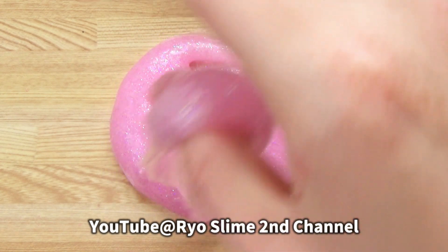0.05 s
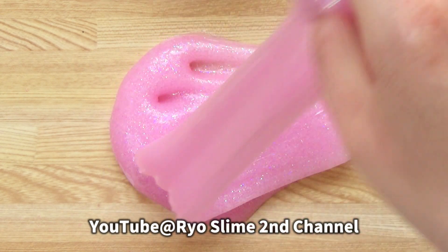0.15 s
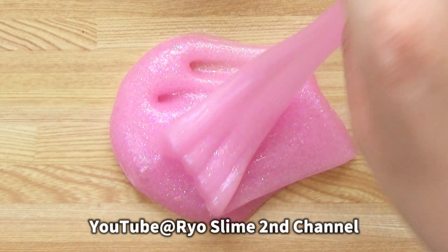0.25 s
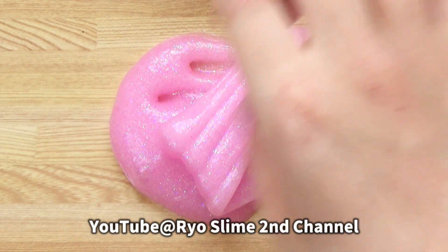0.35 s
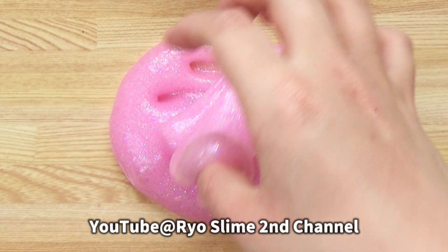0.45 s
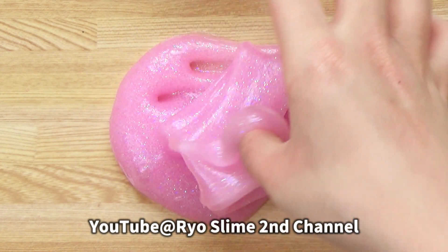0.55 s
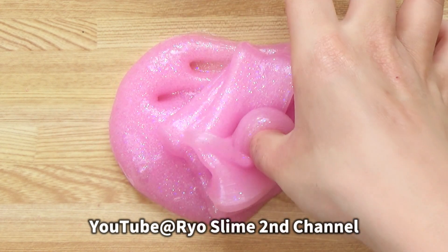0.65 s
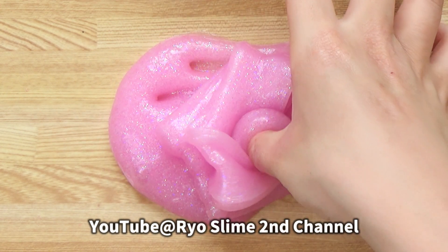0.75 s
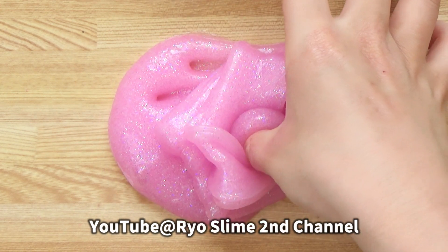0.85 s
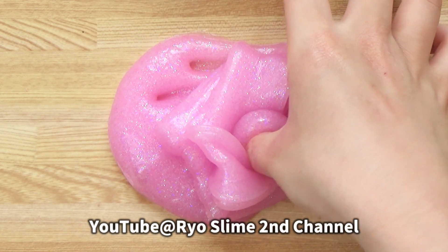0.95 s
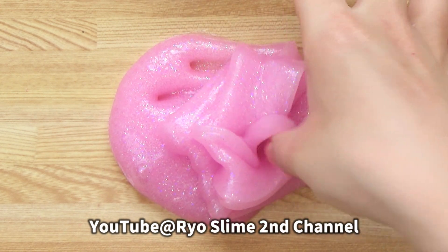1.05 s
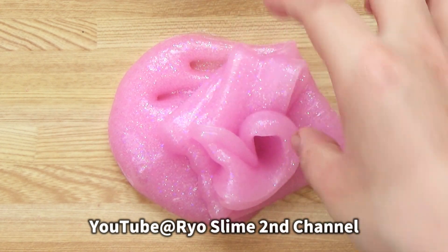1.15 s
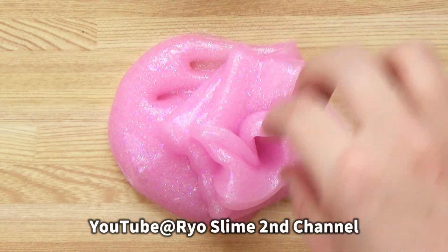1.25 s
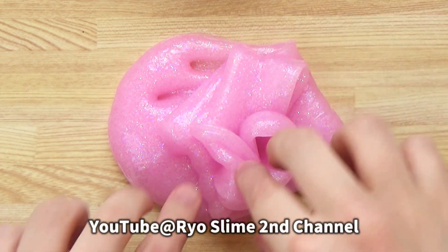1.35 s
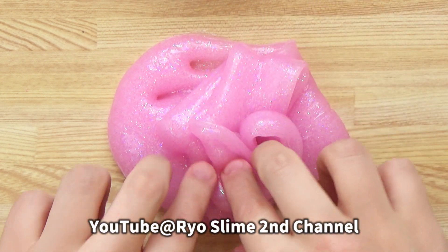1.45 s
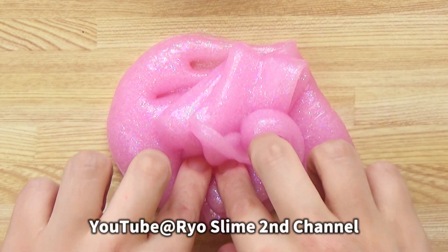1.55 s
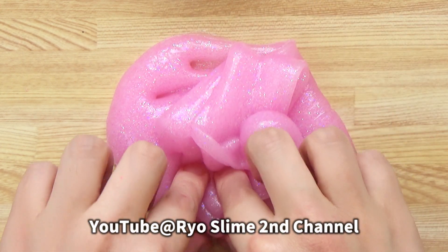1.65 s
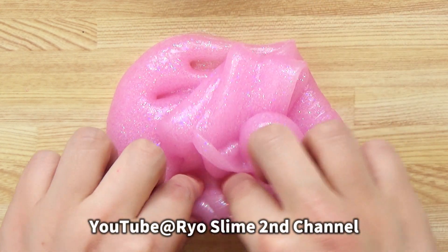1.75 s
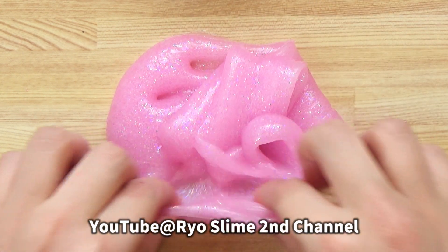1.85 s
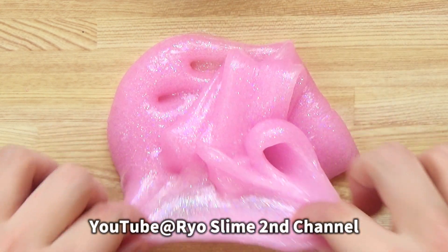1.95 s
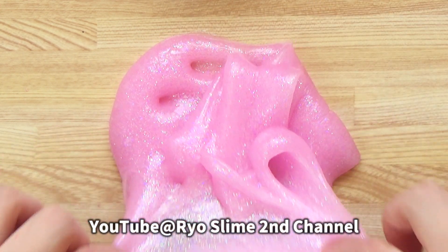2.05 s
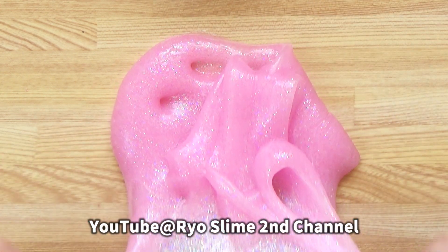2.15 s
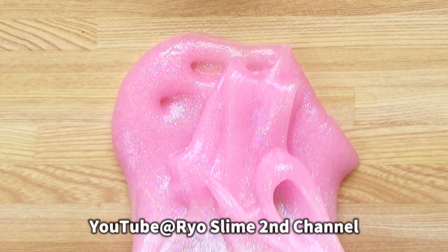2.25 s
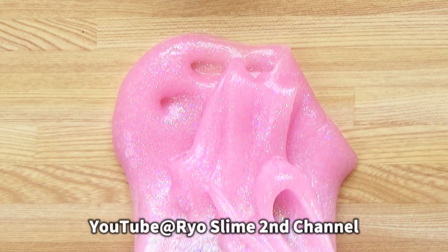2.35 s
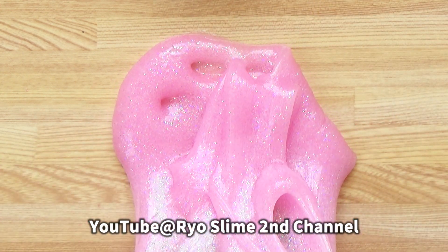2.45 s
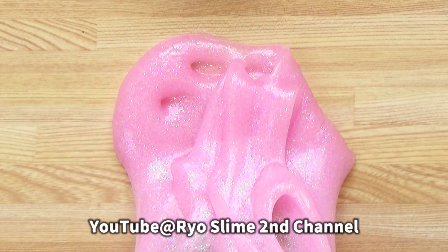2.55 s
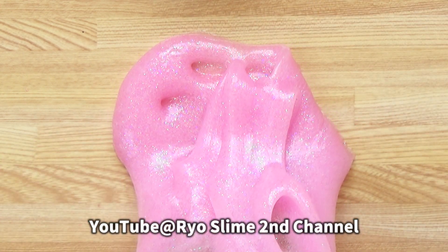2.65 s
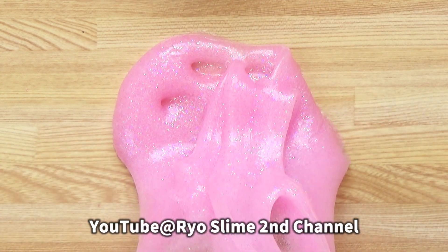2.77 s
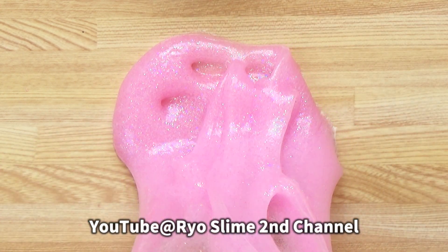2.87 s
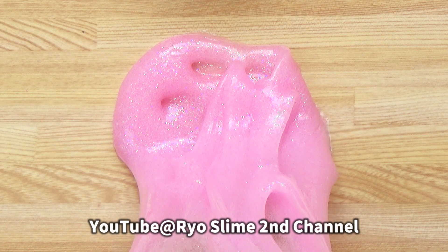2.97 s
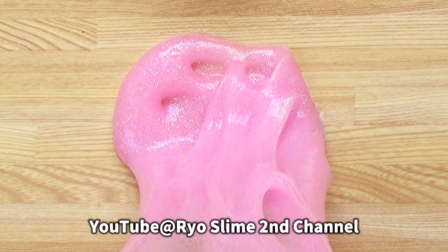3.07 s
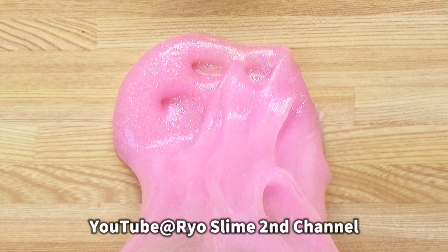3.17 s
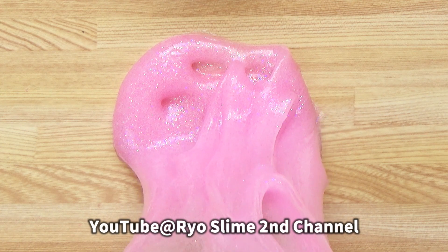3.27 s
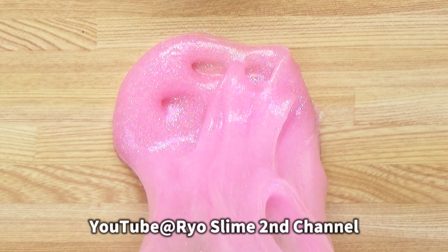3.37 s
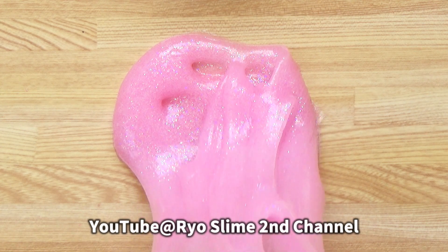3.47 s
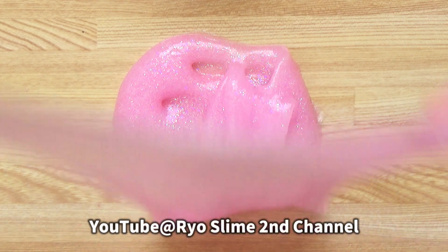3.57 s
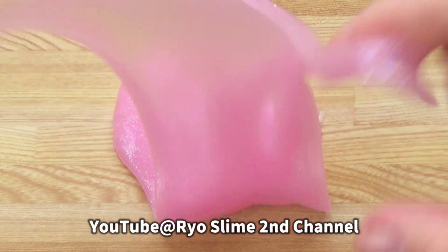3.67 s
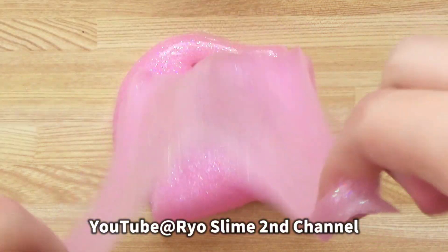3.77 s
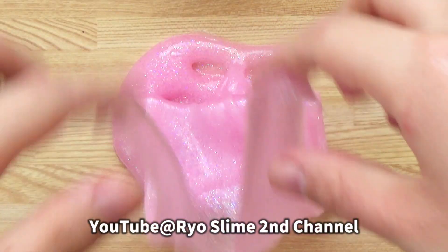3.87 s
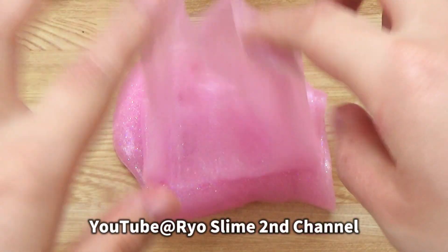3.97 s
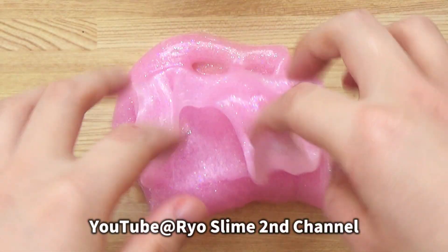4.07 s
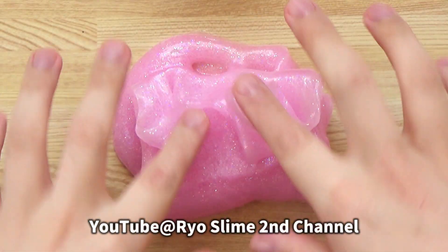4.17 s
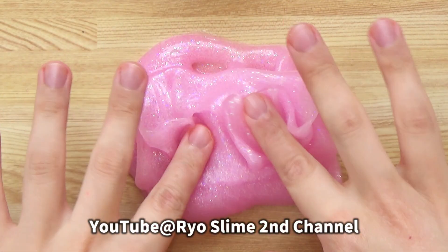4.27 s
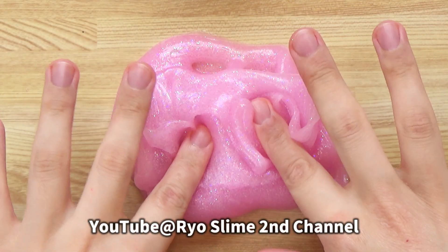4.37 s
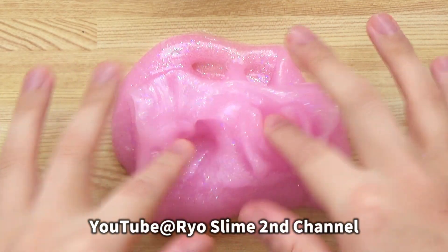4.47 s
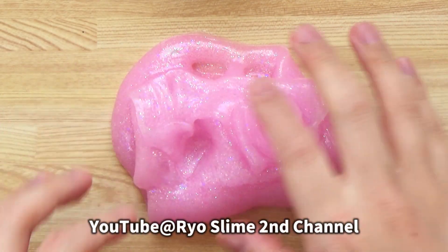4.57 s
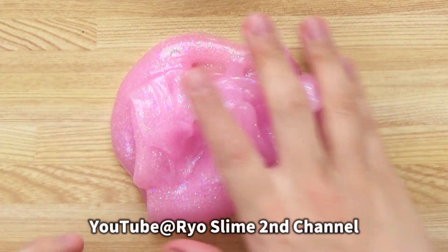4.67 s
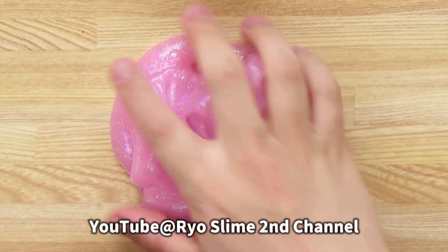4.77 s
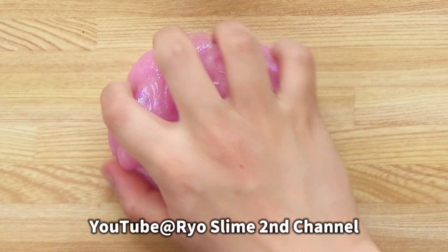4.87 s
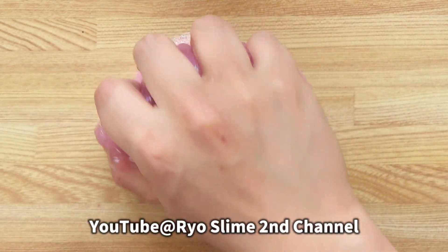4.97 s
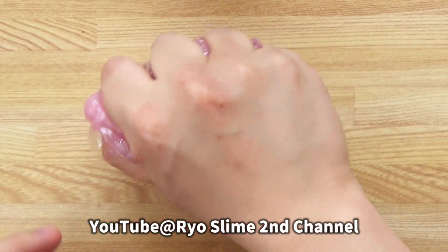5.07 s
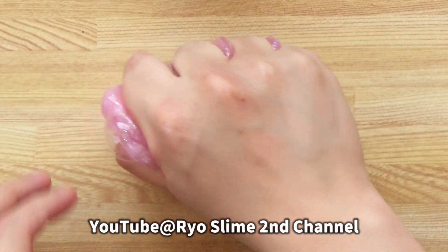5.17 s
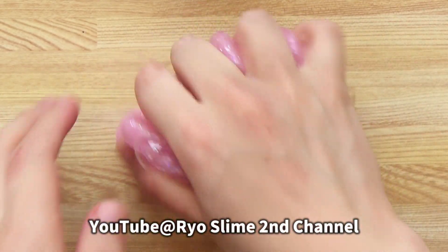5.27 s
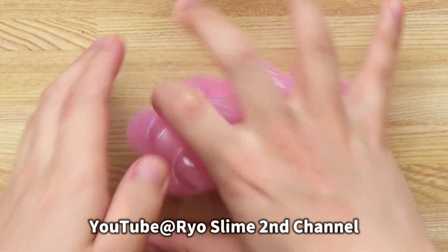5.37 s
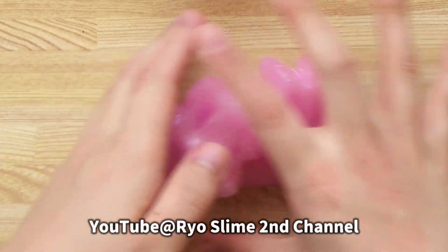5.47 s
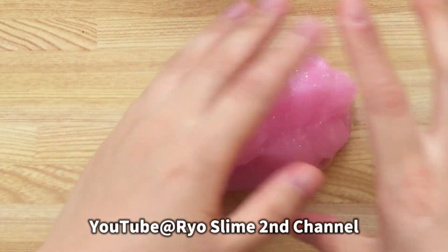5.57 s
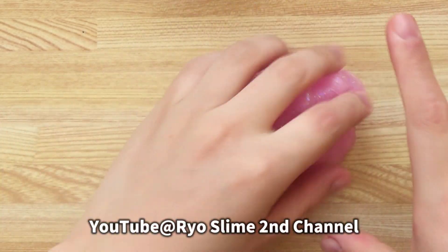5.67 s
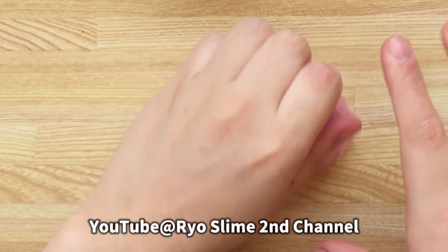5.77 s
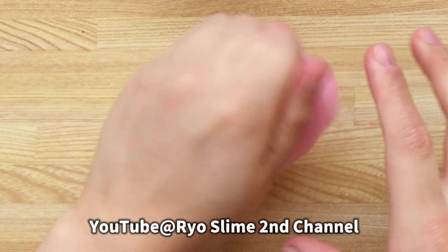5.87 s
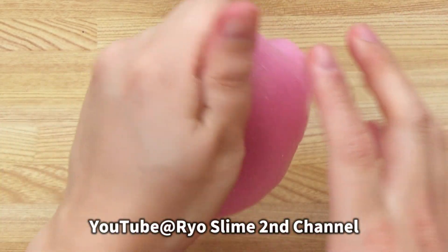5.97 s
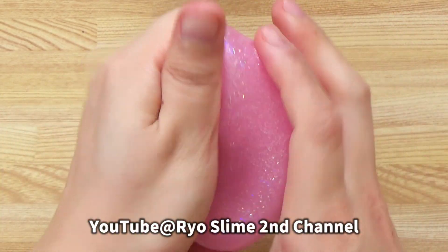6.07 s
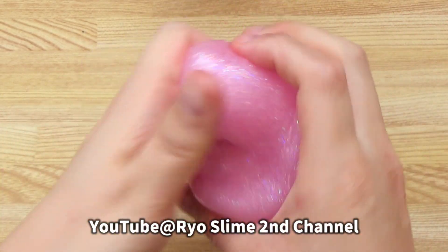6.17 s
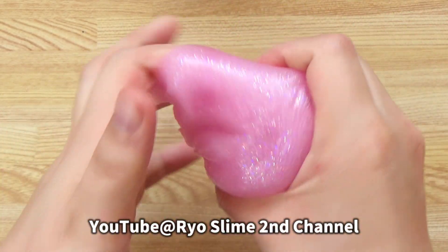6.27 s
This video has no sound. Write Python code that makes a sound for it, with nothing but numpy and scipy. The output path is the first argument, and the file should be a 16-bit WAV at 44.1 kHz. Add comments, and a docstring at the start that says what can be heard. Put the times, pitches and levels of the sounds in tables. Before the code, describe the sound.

Hands work sticky slime on a wooden table, heard close up in stereo over the soft tone of a small room. The first second holds a few soft, low thuds and faint sticky ticks. At about 1.1 seconds an air pocket pops loudly with a wet squelch. Near 1.9 seconds another squeeze brings a sharp snap and crackle. From 2.2 to 3.8 seconds it is quiet, with only a faint sizzle of tiny bubbles as the slime stretches. Around 4 seconds the table thuds several times, once heavily, and rumbles briefly; a squelch and more thuds follow at 4.5. From 4.9 to about 6.3 seconds comes a busy run of kneading: slime snaps off the fingers, pockets pop, bubbles click and fizz, and air squirts out, most sharply near 5.85 seconds. The slime sounds have a slight, short room echo.

```python
"""A hand squishes, stretches and folds sticky slime on a wooden table, close to two microphones.
First come soft thuds over the quiet tone of a small room. After a second the slime pops and squelches;
the room tone sinks, as it does twice more. Near two seconds comes another squeeze, then a faint sizzle of
tiny bubbles. Around four seconds the table thuds and rumbles. From five on, sticky skins snap off the
fingers, holes pop and air squirts in a busy run. The slime's sounds echo briefly in the room."""
import sys
import numpy as np
from scipy import signal
from scipy.fft import rfft, irfft
from scipy.io import wavfile

SR = 44100
rng = np.random.default_rng(int(sys.argv[2]) if len(sys.argv) > 2 else 0)


def inscribe(sig):
    """Save sig as 16-bit PCM at rate SR to the path in sys.argv[1].

    A 1-D sig is mono; a 2-D sig holds one channel per row.
    Samples are clipped to [-1, 1] before scaling.
    """
    pcm = np.round(np.clip(np.atleast_2d(sig).T, -1, 1) * 32767)
    wavfile.write(sys.argv[1], SR, pcm.astype(np.int16))


N = 279153
TIME = np.arange(N) / SR
SIDES = np.array([[1], [-1]])  # left, right

# Slime and palms landing on the table. Each row: start in seconds, peak in dB, push length in seconds.
TABLE_BLOWS = [(0.083, -14, 0.013), (0.336, -13, 0.0057), (0.52, -15.5, 0.0089), (0.852, -18, 0.0092),
               (1.149, -10, 0.0067), (1.932, -17.5, 0.0027), (3.812, -14, 0.0068), (3.94, -12.5, 0.0013),
               (4.011, -10.5, 0.0054), (4.071, -1.5, 0.0098), (4.116, -18, 0.0048), (4.231, -20.5, 0.0096),
               (4.537, -8, 0.0025), (4.574, -7.5, 0.0046), (4.927, -18.5, 0.0048), (5.0707, -23.5, 0.001),
               (5.211, -25, 0.0017), (5.379, -11.5, 0.0036), (5.84, -23.5, 0.0073), (6.067, -31, 0.0032),
               (6.281, -23.5, 0.0074)]


def undb(db):
    """Turn decibels (dB) into a factor to multiply by."""
    return 10 ** (np.asarray(db) / 20)


def band(x, lo_hz, hi_hz, order=2):
    """Keep mainly what lies between two frequencies."""
    return signal.sosfilt(signal.butter(order, [lo_hz, min(hi_hz, .45 * SR)], "band", fs=SR, output="sos"), x)


def unit(x):
    """Scale a signal to an average power of 1."""
    return x / np.sqrt(np.mean(x ** 2))


def add(out, sound, start, pan_db=0.):
    """Mix a short sound in at start seconds, pan_db louder on the left than on the right."""
    i = int(start * SR)
    n = min(sound.shape[-1], N - i)
    out[:, i:i + n] += (sound * undb(SIDES * pan_db / 2))[:, :n]


def stereo_noise(count, alike):
    """Noise at the two microphones: unrelated when alike is 0, the same when it is 1."""
    mid, side = rng.standard_normal((2, count))
    return np.sqrt(1 + alike) * mid + np.sqrt(1 - alike) * side * SIDES


def bubbles(count, per_s, spread_db, alike):
    """Bubbles burst at random moments, most faintly and a few strongly."""
    bursts = rng.random(count) < per_s / SR
    strength = undb(spread_db * np.minimum(rng.exponential(size=count), 4))
    puffs = signal.lfilter([1], [1, -.95], bursts * strength)  # each lets out air for half a millisecond
    return puffs * stereo_noise(count, alike)


def swell(t, fade_s, rise_share):
    """A rise to full strength at t = 0, taking a share of the fade time, then a rounded fade."""
    return np.where(t < 0, np.exp(-(t / (rise_share * fade_s)) ** 2), np.exp(-abs(t / fade_s) ** 1.44))


def dips(sink_s=0.14, return_s=0.31):
    """The background level sinks fast at three moments and creeps back."""
    # Each row: start in seconds, strength in dB (the dip reaches about 0.4 of it).
    level_dips = [(1.1, 33.5), (1.951, 12.5), (5.3, 36)]
    elapsed = [(np.maximum(TIME - start, 0), db) for start, db in level_dips]
    return undb(-sum(db * (1 - np.exp(-t / sink_s)) * np.exp(-t / return_s) for t, db in elapsed))


def room_tone(level_db=-49, split_hz=500, extra_dip=.8):
    """The room's own soft noise, duller towards the top; the part above split_hz dips deeper."""
    # The colour of the noise. Each row: frequency in Hz, relative level in dB.
    tone_colour = [(70, -44), (110, -7.5), (500, -16), (1100, -18), (1800, -29.5), (3500, -37), (6000, -73)]
    hz, db = np.transpose(tone_colour)
    freqs = np.arange(N // 2 + 1) * SR / N
    colour = undb(np.interp(np.log(freqs + 1), np.log(hz), db))
    noise = unit(irfft(rfft(stereo_noise(N, 0.44)) * colour, N))
    low = signal.sosfiltfilt(signal.butter(2, split_hz, fs=SR, output="sos"), noise)
    return undb(level_db) * dips() * (low + dips() ** extra_dip * (noise - low))


def room_echo(x, level_db=-21, low_ring_s=0.4, high_ring_s=.3):
    """A fading cloud of echoes, a little different at each microphone; the treble dies first."""
    t = TIME[:SR // 2]
    noise = unit(stereo_noise(len(t), 0.83)) * (t > .004)
    low = band(noise, 100, 1900) * undb(-60 * t / low_ring_s)
    high = band(noise, 2500, 7200) * undb(-60 * t / high_ring_s)
    echo = low + .5 * high
    echo /= np.sqrt(np.sum(echo ** 2) / 2)
    return undb(level_db) * signal.fftconvolve(x.mean(axis=0)[None], echo, axes=1)[:, :N]


def table_rumble(shake_db=-16, fade_s=0.063, rest_db=-44.5):
    """The table top shakes in low, uneven lumps, most just after a blow."""
    lumps = undb(3 * unit(band(rng.standard_normal(N), 3, 15)))
    noise = stereo_noise(N, .25) * lumps
    rumble = unit(band(noise, 37, 93) + 0.38 * band(noise, 20, 185))
    shake = sum(undb(db + shake_db) * (TIME > start) * np.exp(-abs(TIME - start) / fade_s)
                for start, db, _ in TABLE_BLOWS)
    return (shake + undb(rest_db) * dips()) * rumble


def table_thuds(spread_db=2, phase_rad=.55):
    """A soft blow sets the table top swinging; the two microphones pick it up out of step."""
    # The ways the top swings. Each row: pitch in Hz, relative level in dB, seconds to fade by 60 dB.
    table_modes = [(37.4, 0, 0.12), (45.7, -1.5, 0.48), (63.06, 0, 0.68), (83, -4, 0.24), (130, 0, 0.2),
                   (191, -13, 0.049)]
    out, t = np.zeros((2, N)), TIME[:SR // 2]
    chance = rng.standard_normal((len(TABLE_BLOWS), 2, len(table_modes)))
    for (start, db, push_s), (sizes, leads) in zip(TABLE_BLOWS, chance):
        swing = 0
        for (hz, mode_db, ring_s), size, lead in zip(table_modes, sizes, leads):
            fade = undb(mode_db + spread_db * size - 60 * t / ring_s)
            swing += fade * np.sin(2 * np.pi * hz * t + phase_rad * np.sign(lead) * SIDES)
        push = np.hanning(int(push_s * SR) + 3)  # a longer push favours the low swings
        thud = signal.lfilter(push, [1], swing)
        add(out, -undb(db) * thud / abs(thud).max(), start)
    return out


def sizzle(ticks_db=-4.0):
    """Resting and stretching slime ticks over a thin hiss, small bubbles higher than large ones."""
    # How loud the surface hisses. Each row: time in seconds, level in dB.
    hiss_levels = [(0, -68.5), (1.05, -61.5), (1.25, -103), (1.55, -83.5), (1.85, -56.5), (2.3, -64.5),
                   (2.95, -56.5), (3.3, -66), (3.95, -58), (4.4, -85), (4.8, -61.5), (5.05, -42),
                   (5.42, -38.5), (5.58, -100), (5.75, -82.5), (5.87, -31.5), (6.15, -48), (6.33, -40)]
    ticks = sum(band(bubbles(N, 30, 4.5, .4), hz, 1.8 * hz) for hz in (2000, 3200, 5500))
    flicker = undb(4.7 * unit(band(rng.standard_normal(N), 2, 15, order=1)))
    hiss = flicker * band(stereo_noise(N, 0.067), 1800, 13000)
    level = undb(np.interp(TIME, *np.transpose(hiss_levels)))
    return level * (unit(hiss) + undb(ticks_db) * unit(ticks))


def bubble_ticks(fade_s=0.00025):
    """Single tiny bubbles burst at the surface, each with a thin, bright click."""
    # Each row: start in seconds, peak in dB.
    tiny_bursts = [(0.6905, -19.5), (1.1458, -8.5), (1.869, -18.5), (2.531, -27.5), (4.9195, -7),
                   (4.933, -10), (4.95, -8), (4.9597, -4), (4.983, -5.5), (5.019, -4), (5.0952, -10.5),
                   (5.5215, -17.5), (5.898, -0.5), (5.947, -10.5), (5.9503, -5.5), (5.9752, -6.5),
                   (6.001, -26), (6.031, -19.5), (6.0455, -3)]
    out, t = np.zeros((2, N)), TIME[:SR // 100]
    for start, db in tiny_bursts:
        click = band(stereo_noise(len(t), 0.42) * np.exp(-t / fade_s), 3500, 12000, order=1)
        add(out, undb(db) * click / abs(click).max(), start)
    return out


def air_squirts():
    """Air squirts through a narrow wet gap, which whistles roughly around one pitch."""
    # Each row: time of full strength in seconds, fade in seconds, level in dB, pitch in Hz.
    squirts = [(4.878, 0.15, -38, 3830), (5.852, 0.039, -17.5, 3790), (5.95, 0.15, -49, 4000)]
    out, t = np.zeros((2, N)), TIME[:SR // 2] - .2
    for peak_s, fade_s, db, hz in squirts:
        jet = band(bubbles(len(t), 3500, 1.3, 0.57), hz / 1.2, hz * 1.22)
        add(out, undb(db) * swell(t, fade_s, rise_share=.225) * unit(jet), peak_s + t[0])
    return out


def pocket_pops(glide=0.024, rise_s=0.00045, ring_cycles=7):
    """An opening air pocket rings like a bottle; its pitch climbs as the mouth widens."""
    # Each row: start in seconds, peak in dB, starting pitch in Hz.
    pockets = [(0.998, -12.5, 222), (1.0806, 2, 1100), (1.891, -19.5, 710), (1.977, -20.5, 648),
               (3.972, -24, 920), (4.067, -21, 470), (4.128, -14, 184), (4.426, -31, 1070),
               (4.523, -14.5, 1240), (4.5496, -10.5, 880), (5.004, -22, 600), (5.0245, -10, 1570),
               (5.028, -14.5, 1310), (5.0728, -4.5, 860), (5.0725, -12, 122.4), (5.102, -7, 995),
               (5.2469, -2.5, 1110), (5.381, -6.5, 2250), (6.102, -19.5, 555), (6.2, -22, 620)]
    out, t = np.zeros((2, N)), TIME[:SR // 8]
    for start, db, hz in pockets:
        ring_s = ring_cycles / hz
        fade = (1 - np.exp(-t / rise_s)) * undb(-60 * t / ring_s)
        phase = 2 * np.pi * hz * t * (1 + glide * t / (t + ring_s))
        add(out, undb(db) * fade / fade.max() * np.sin(phase), start)
    return out


def thumb_flutter(rise_s=0.0033, fall_s=0.0056):
    """The wet rim of a hole flaps unevenly as the thumb pulls out."""
    # One row: start in seconds, length in seconds, level in dB, pitch in Hz, relative overtone in dB.
    thumb_hole = (1.0905, .02, -6, 705, -6)
    start, length_s, db, hz, overtone_db = thumb_hole
    out, t = np.zeros((2, N)), TIME[:SR // 8]
    pitch_wobble, level_wobble = unit(band(rng.standard_normal((2, len(t))), 60, 300))
    phase = 2 * np.pi * hz * np.cumsum(1 + 0.023 * pitch_wobble) / SR
    fade = np.clip(np.minimum(t / rise_s, (length_s - t) / fall_s), 0, 1)
    ring = np.sin(phase) + undb(overtone_db) * np.cos(1.95 * phase)
    add(out, undb(db + 2.6 * level_wobble) * fade * ring, start)
    return out


def skin_snaps(body_fade_s=0.0018, edge_fade_s=0.00025):
    """Sticky skin tears loose from a finger: a short, broad burst with a finer, brighter edge."""
    # Each row: start in seconds, peak of the body in dB, colour in Hz, edge against body in dB.
    tears = [(0.3382, -25, 3000, -33), (0.5281, -17.5, 2210, -23), (1.093, -2.5, 1390, -13.5),
             (1.888, -16.5, 3450, -16), (1.929, -0.5, 5180, -34), (2.0782, -20, 6180, -1),
             (2.9638, -30, 2480, -13.5), (3.107, -26.5, 2760, 4.5), (3.831, -32, 3050, 7),
             (3.9568, -18, 5600, -15.5), (4.0685, -19.5, 1640, -24), (4.1027, -16.5, 3370, -33),
             (4.1306, -20.5, 1890, 13.5), (4.244, -36.5, 2310, -22), (4.5636, -4.5, 4350, 10.5),
             (5.0425, -3.5, 4010, -20), (5.0469, -5.5, 2205, -20), (5.071, 2, 5500, -13.5),
             (5.1702, -11, 2390, -8), (5.2075, -10, 5000, 11.5), (5.2143, -1, 3490, 15),
             (5.7703, -25.5, 2770, -10), (5.8024, -32, 2710, 11), (5.8433, -1, 3750, -12),
             (6.0666, -14, 6900, 9), (6.29, -6, 7440, -18)]
    out, t = np.zeros((2, N)), TIME[:SR // 20]
    crack = 8 * (t == 0)  # each tear starts with one hard crack
    for start, db, hz, edge_db in tears:
        burst = (stereo_noise(len(t), 0.81) + crack) * np.exp(-t / body_fade_s)
        body = band(burst, hz / 1.5, hz * 1.096) + 0.74 * band(burst, 300, 3800)
        edge = band(stereo_noise(len(t), .2) * np.exp(-t / edge_fade_s), 7000, 16000)
        snap = body / abs(body).max() + undb(edge_db) * edge / abs(edge).max()
        add(out, undb(db) * snap, start, pan_db=0.58 * rng.standard_normal())
    return out


def squelches(crackle_db=-9):
    """A wet squeeze bursts a swarm of bubbles: large ones ring, fine ones fizz, a few crack alone."""
    # Each row: time of full strength in seconds, fade in seconds, level of the body in dB,
    # colour in Hz (the ring lies near three quarters of it), fizz against body in dB.
    squeezes = [(0.526, 0.025, -45.5, 2710, -1.5), (0.697, 0.03, -68, 6640, 21.5),
                (1.099, 0.035, -22.5, 1193, -4.5), (1.869, 0.03, -38.5, 3960, -8.5),
                (1.936, 0.073, -33, 5080, -11.5), (1.942, 0.02, -25, 540, -26),
                (2.061, 0.099, -46.5, 4260, -0.5), (3.542, 0.084, -59.5, 6900, 6),
                (3.698, 0.025, -73, 7860, 24.5), (3.943, 0.043, -49, 3500, 10),
                (4.313, 0.012, -42.5, 3090, -4), (4.535, 0.028, -21.5, 2540, -6),
                (4.553, 0.012, -20, 1200, -0.5), (4.935, 0.11, -31, 2150, -1),
                (5.024, 0.012, -21.5, 2820, -6.5), (5.101, 0.0181, -36, 1500, -16),
                (5.209, 0.0067, -18, 4740, -4.5), (5.228, 0.048, -27.5, 4910, -3.5),
                (5.359, 0.011, -18, 1600, -18), (5.362, 0.048, -23, 3350, -7),
                (5.445, 0.035, -40, 3600, -13.5), (5.845, 0.0049, -16, 3920, -12),
                (5.94, 0.061, -32.5, 3670, -7), (6.0705, 0.0038, -16, 3650, 7),
                (6.195, 0.027, -38.5, 3130, 8), (6.29, 0.06, -31.5, 2750, 2.5)]
    out, t = np.zeros((2, N)), TIME[:SR // 3] - .1
    for peak_s, fade_s, db, hz, fizz_db in squeezes:
        large = bubbles(len(t), per_s=1500, spread_db=3.8, alike=0.98)
        ring = band(large, hz / 1.36, hz * 0.79, order=1)
        smack = band(large, 1000, 4200)
        bass = band(bubbles(len(t), 800, 3.5, .6), 73, 500)
        body = unit(ring + 0.8 * smack + 3.5 * bass)
        fizz = unit(band(bubbles(len(t), 1200, 0.69, 0.12), 6000, 12000))
        crackle = unit(band(bubbles(len(t), 130, 5.3, 0.46), hz / 3.2, hz * 3, order=1))
        swarm = body + undb(fizz_db) * fizz + undb(crackle_db) * crackle
        add(out, undb(db) * swell(t, fade_s, rise_share=.45) * swarm, peak_s + t[0])
    return out


def scene():
    """The slime with its echo, the table and the room tone."""
    slime = skin_snaps() + bubble_ticks() + pocket_pops() + thumb_flutter()
    slime += squelches() + air_squirts() + sizzle()
    return slime + room_echo(slime) + table_thuds() + table_rumble() + room_tone()


def record(dry):
    """Clip the highest peaks at full scale, then cut the treble above 16300 Hz."""
    return signal.sosfilt(signal.ellip(10, .2, 90, 16300, fs=SR, output="sos"), np.clip(dry, -1, 1))


dry = scene()
out = record(dry)
inscribe(out)
```